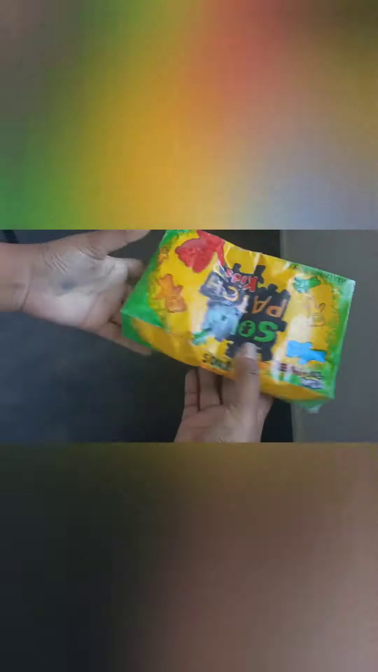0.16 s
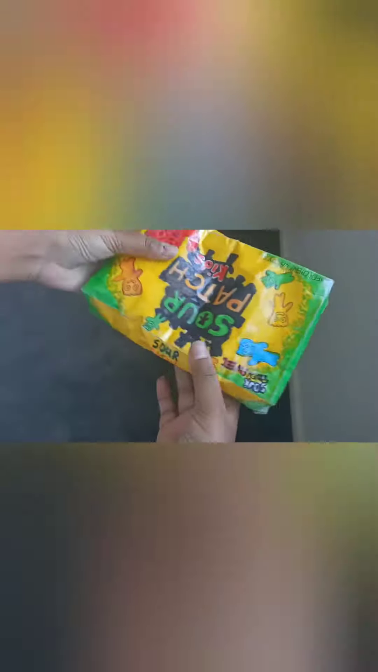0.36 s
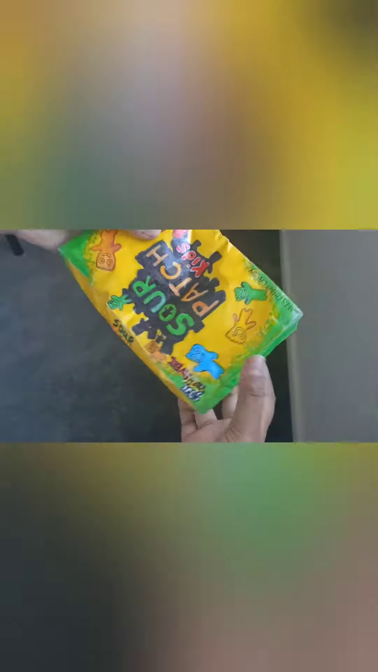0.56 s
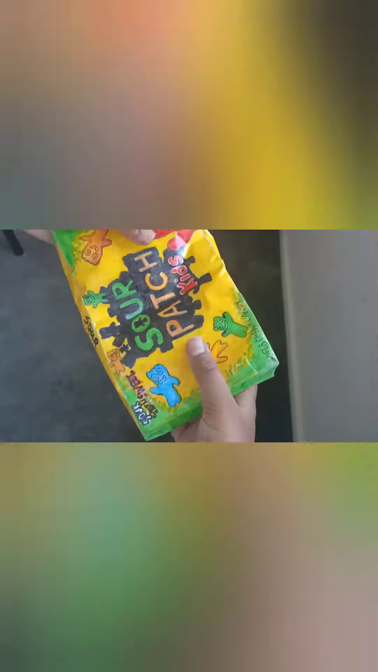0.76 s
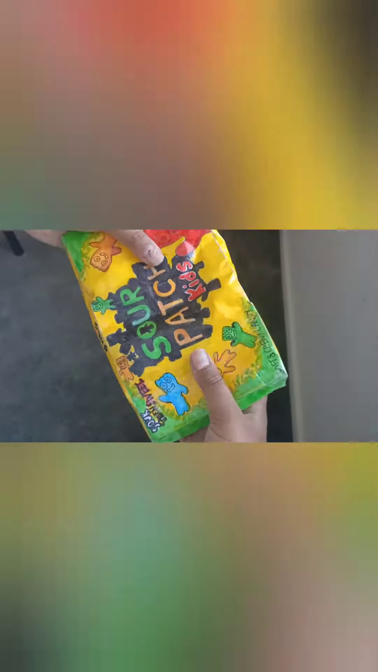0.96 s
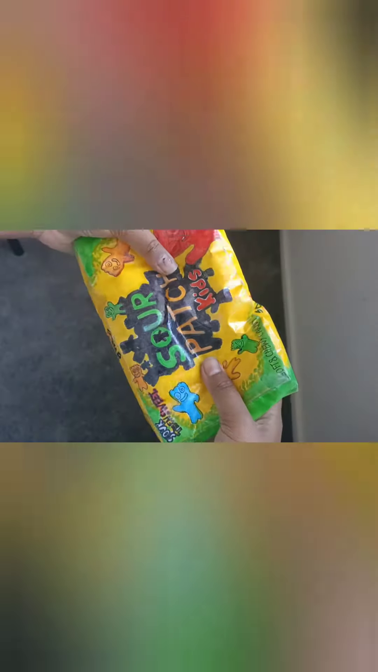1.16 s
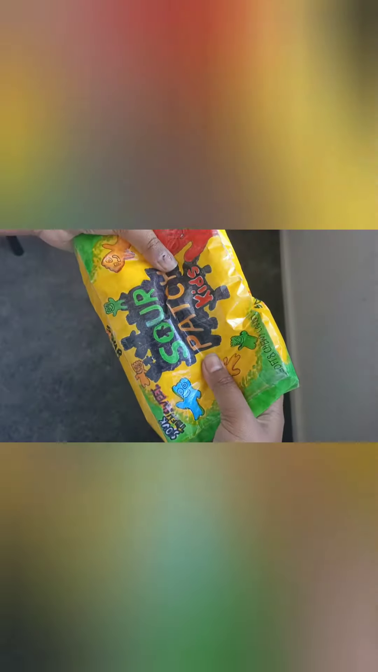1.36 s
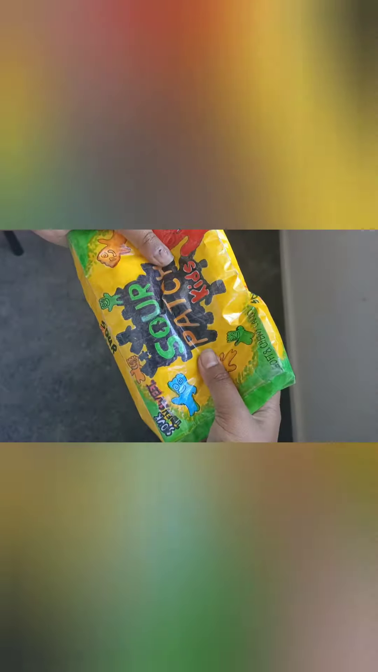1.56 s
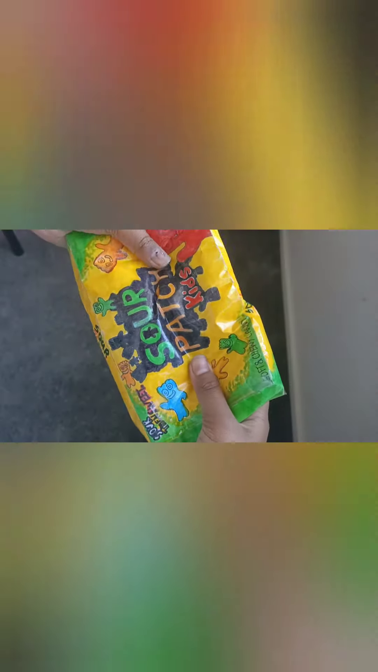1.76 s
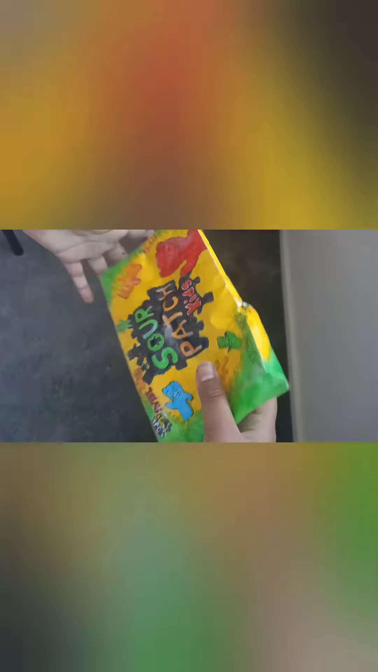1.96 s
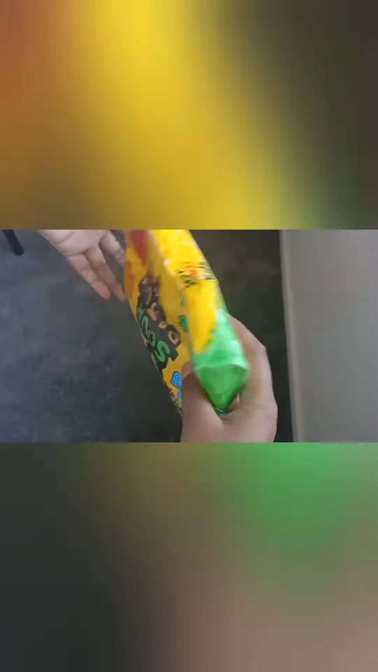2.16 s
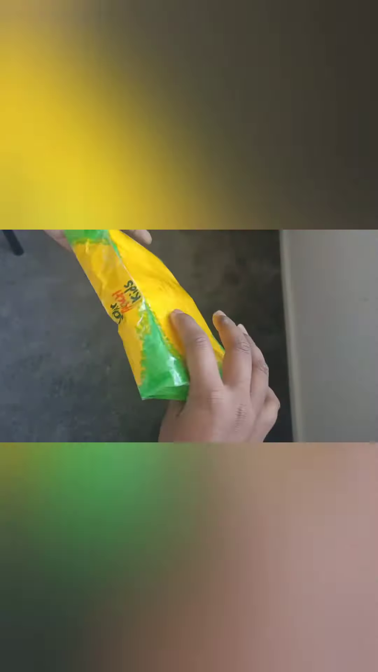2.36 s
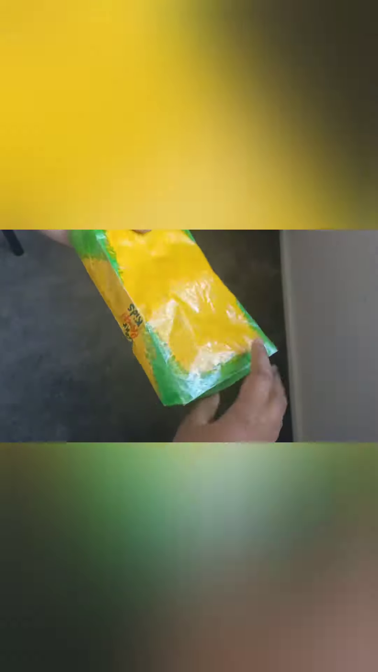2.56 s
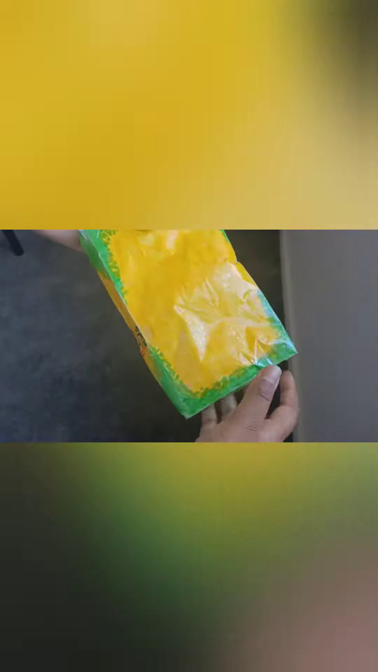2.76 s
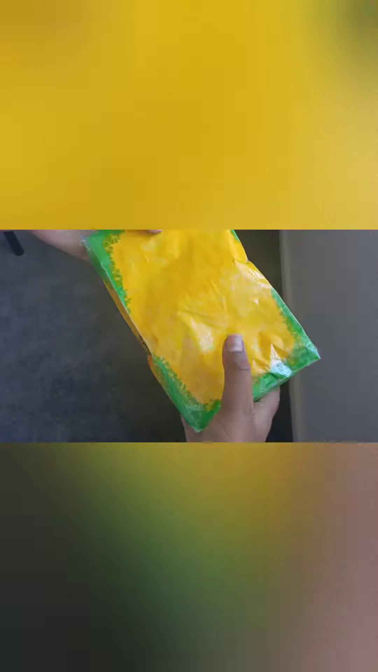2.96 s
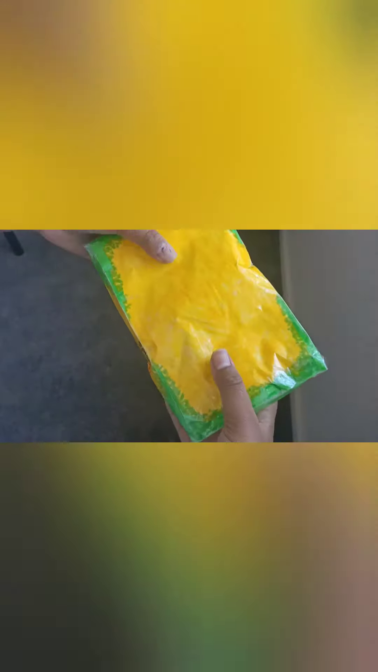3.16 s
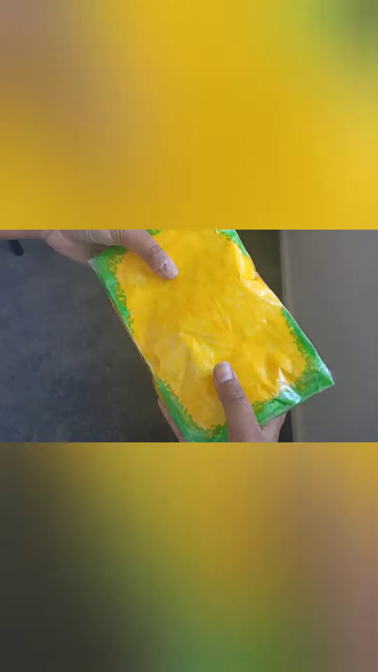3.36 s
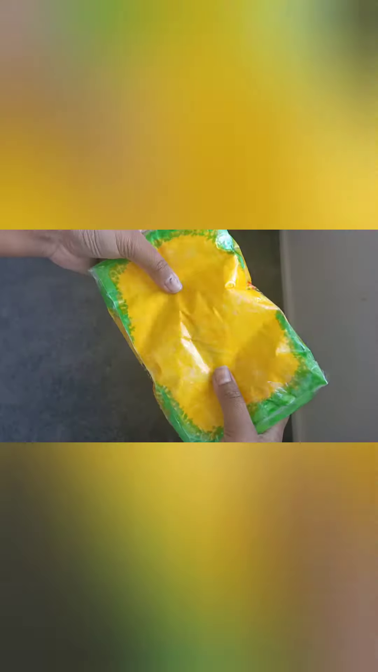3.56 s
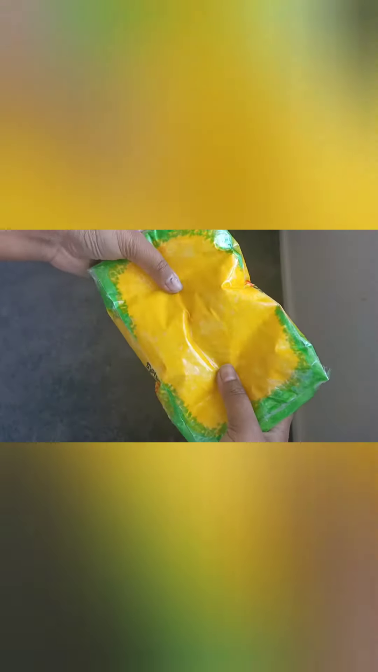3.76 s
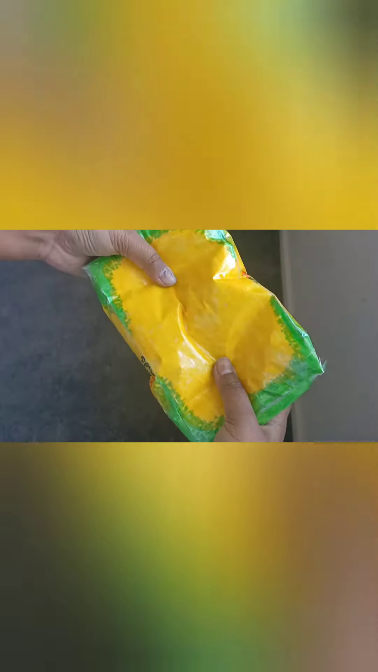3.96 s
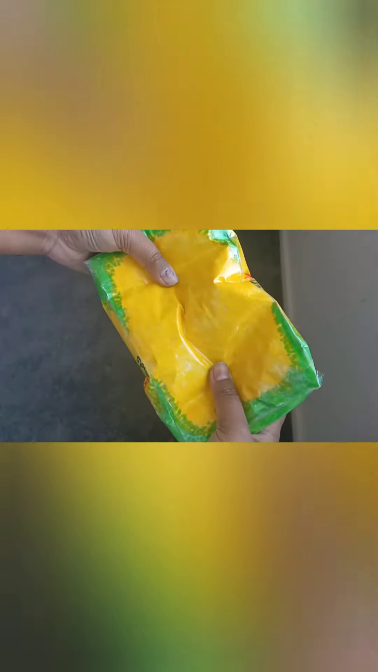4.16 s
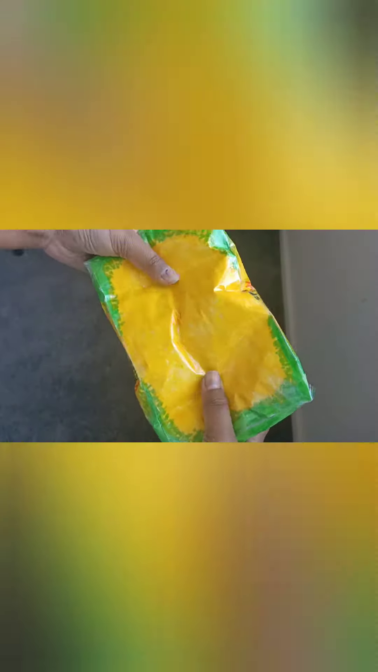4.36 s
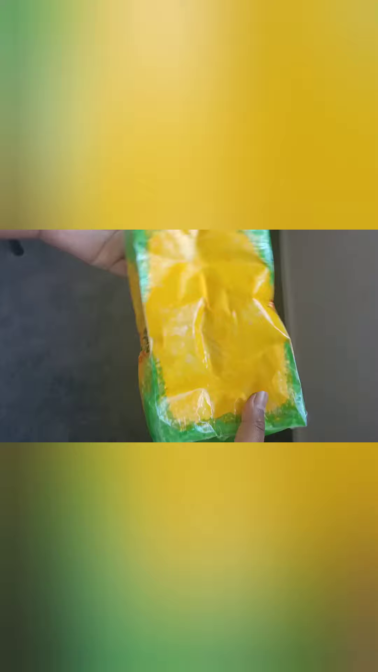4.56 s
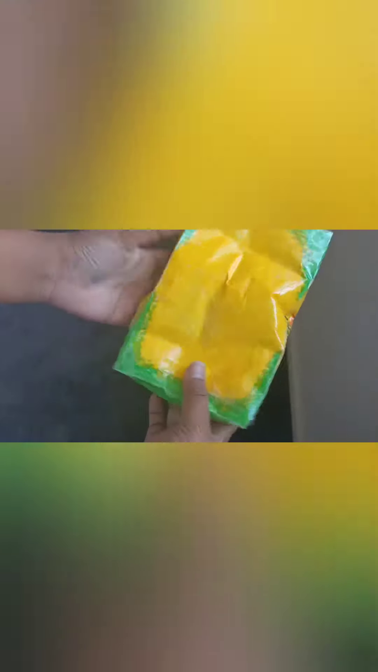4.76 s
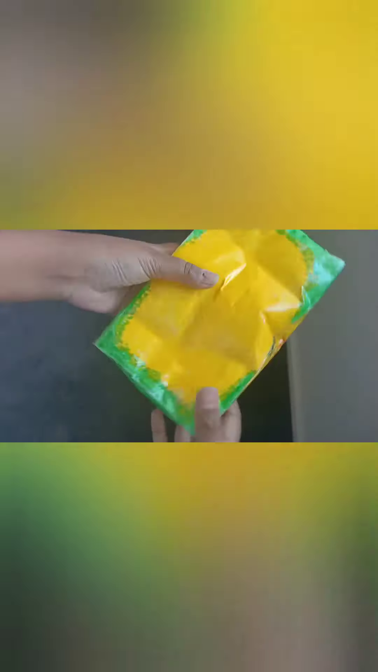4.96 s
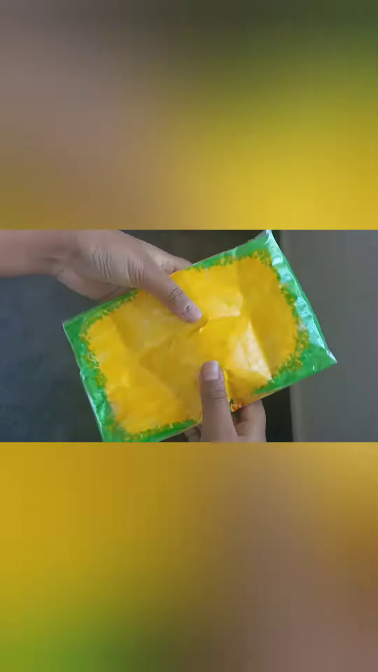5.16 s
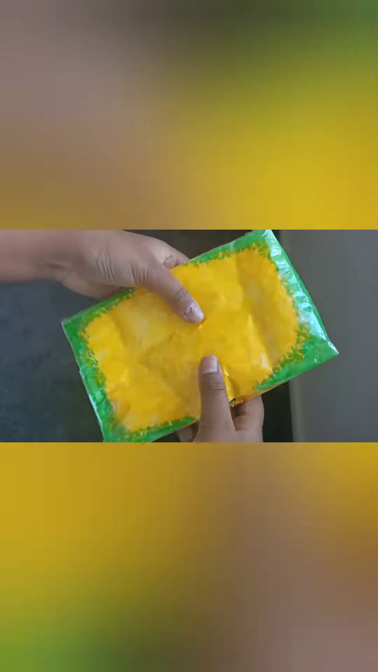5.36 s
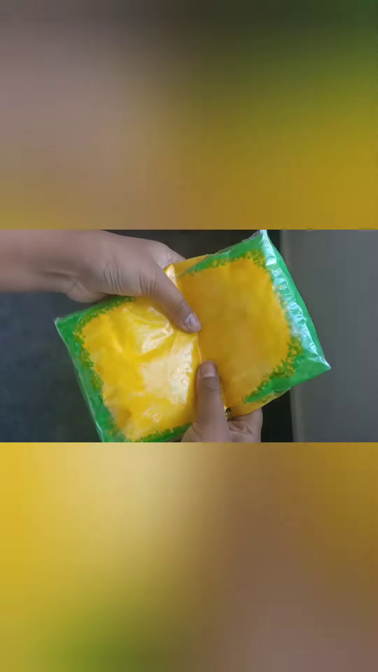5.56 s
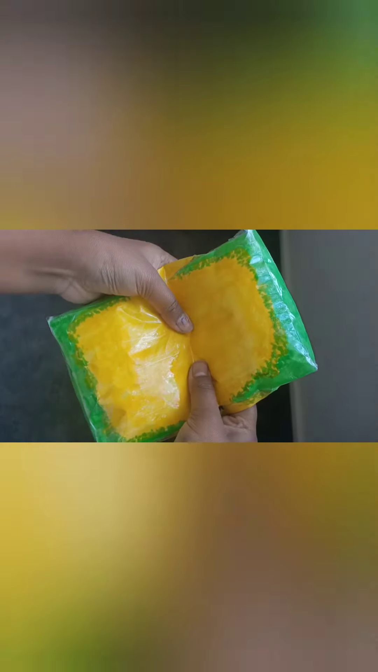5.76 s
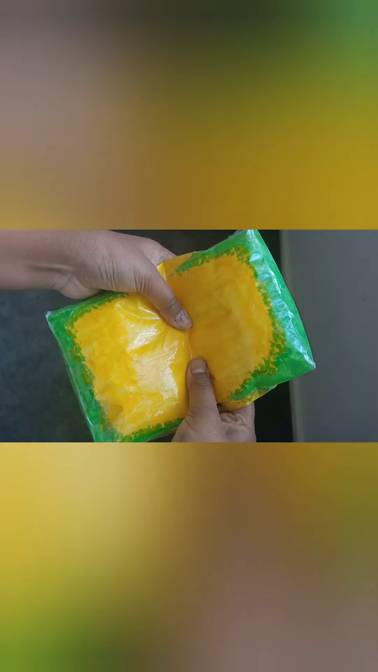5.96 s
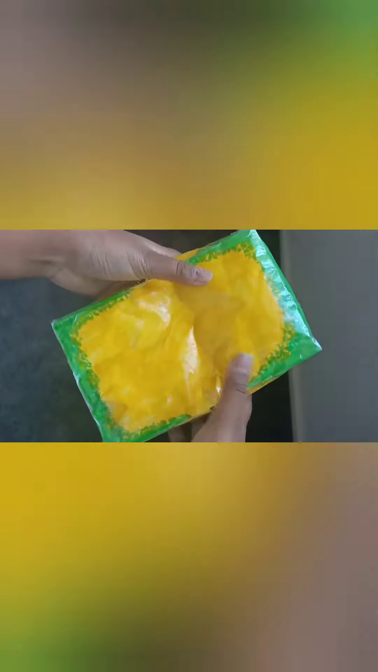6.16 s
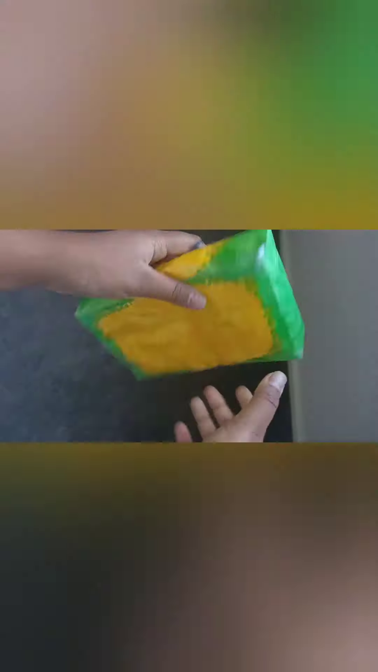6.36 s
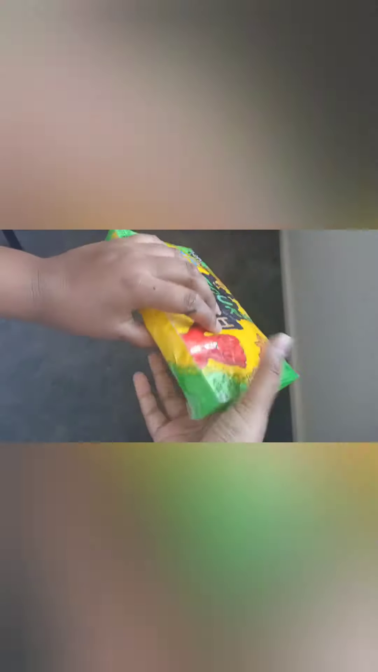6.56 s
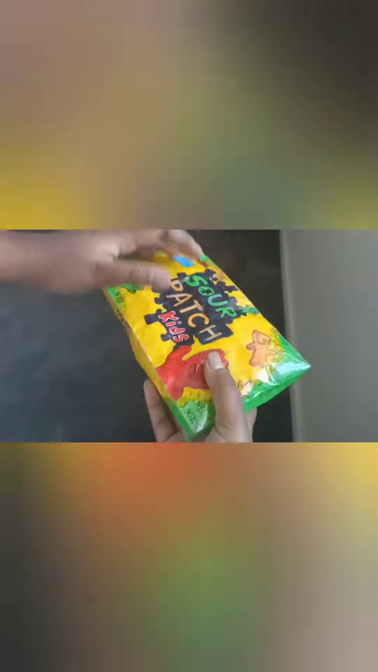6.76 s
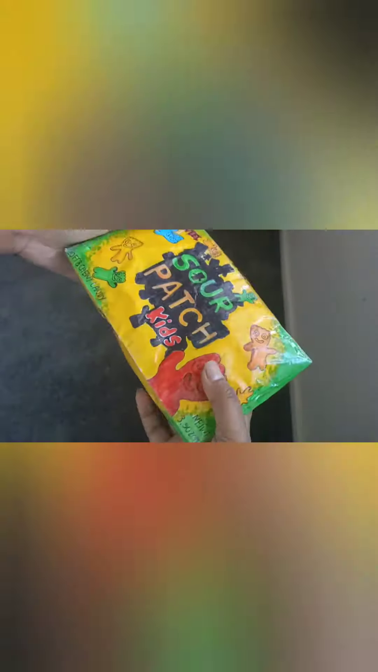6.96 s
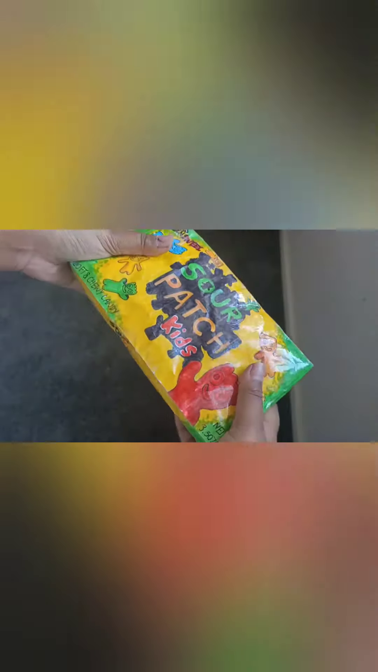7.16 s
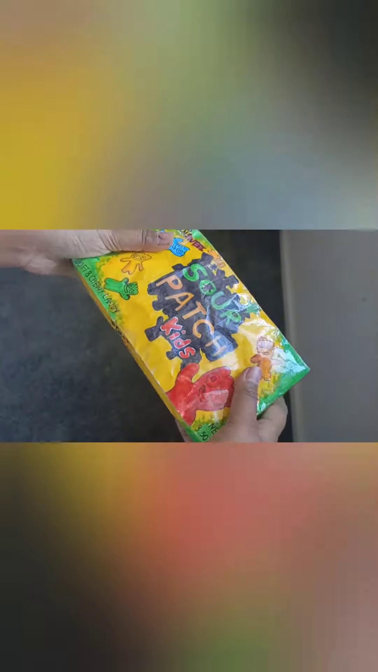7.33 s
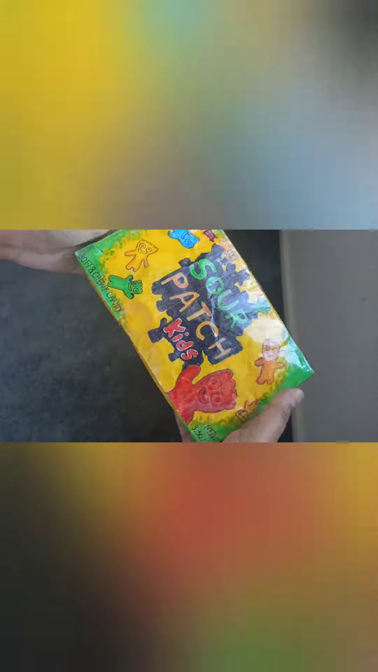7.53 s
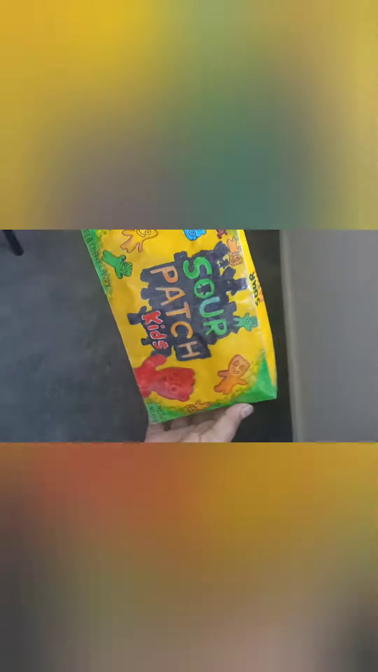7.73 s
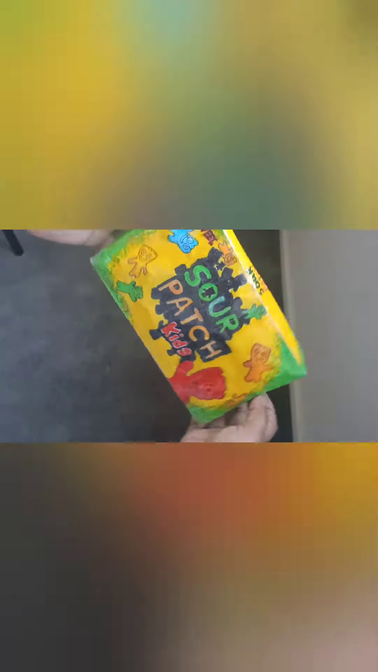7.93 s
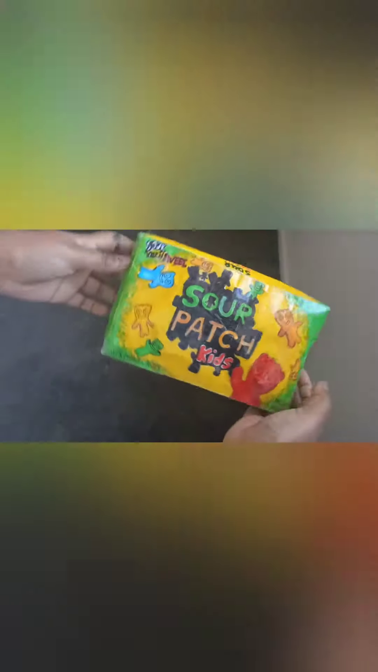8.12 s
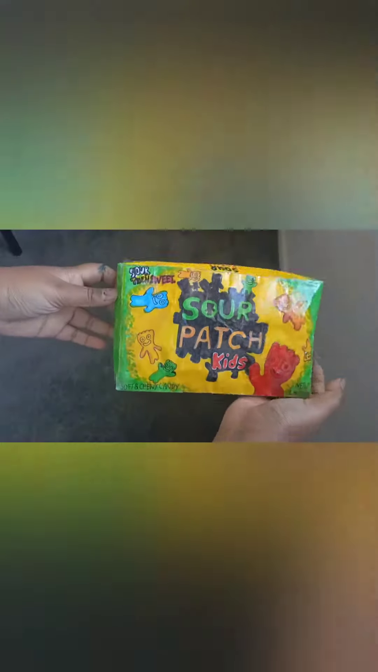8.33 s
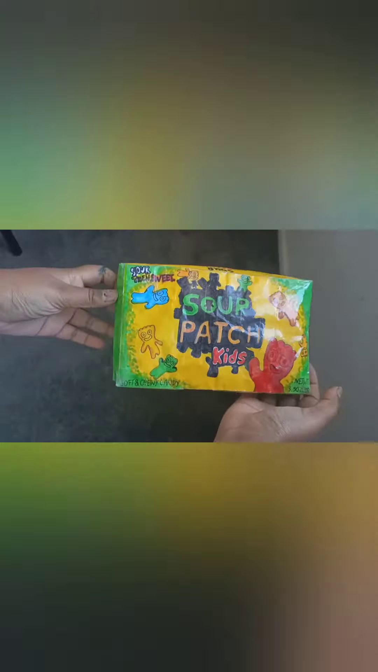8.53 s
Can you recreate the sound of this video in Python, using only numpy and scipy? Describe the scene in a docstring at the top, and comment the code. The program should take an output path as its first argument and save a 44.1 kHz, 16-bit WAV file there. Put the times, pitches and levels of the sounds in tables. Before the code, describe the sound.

A padded paper craft is turned and squeezed by hand. Stiff panels buckle with dry, sharp pops surrounded by fine crackle, dull low finger thumps and grainy rubbing on tape. Air hisses out through the seams during deep squeezes. Bursts are irregular, strongest early and past the middle, then fade to a few ticks. Close stereo pickup, short room tail, soft low room tone.

```python
"""Two hands turn and squeeze a stuffed pouch of taped paper close to a small stereo microphone.
At first fingers slide and bump softly and a faint tone wavers; near 1 s the panels buckle in loud snaps.
More bursts of snaps come near 3.5, 4.4, 5.5 and 6.1 s, then weaker ones near 7.2 s, and last a few faint ones.
Small creases crackle along with the bends, and air hisses through the seams near 1.2, 3.7 and 5.7 s.
A small, quiet room answers with a short tail, over a soft room tone."""
import sys
import numpy as np
from scipy import signal
from scipy.fft import rfft, irfft
from scipy.io import wavfile
from scipy.ndimage import uniform_filter1d

SR = 44100
rng = np.random.default_rng(int(sys.argv[2]) if len(sys.argv) > 2 else 0)


def bounce(signal):
    """Save signal as a 16-bit WAV file at the path given by the first command-line argument."""
    frames = np.transpose(np.atleast_2d(signal))
    limited = np.clip(frames, -1, 1)
    pcm = np.round(limited * 32767).astype(np.int16)
    wavfile.write(sys.argv[1], SR, pcm)


N = 378810
TIME = np.arange(N) / SR  # seconds
SIZE = 2048  # samples in a short pulse
BINS = np.fft.rfftfreq(SIZE, 1 / SR)  # Hz
EDGE_HZ = 15650  # upper limit of the sound

# Buckles of the paper. Each row: time in seconds, nominal level in dB, pitch of the panel in Hz,
# dullness in dB lost per octave above that pitch, left minus right in dB.
SNAPS = [(0.3586, -56, 720.0, 10, 1.0), (0.369, -51.5, 780.0, 7, 6), (0.375, -55, 1200.0, 17, 2),
         (0.757, -58, 530.0, 25, 7), (0.7736, -48.5, 970.0, 2, 1), (0.794, -57, 530.0, 6, -3),
         (0.8823, -56.5, 1200.0, 15.0, 0), (0.9366, -49, 490.0, 8.5, 1), (0.9751, -33, 1500.0, 13.5, -1),
         (0.9843, -33.0, 340.0, 11.5, 4), (1.0049, -20, 370.0, 5, 4.0), (1.0302, -19.5, 970.0, 9.5, 2),
         (1.0411, -35, 1300.0, 8.5, 1.0), (1.089, -37, 530.0, 9, 4.0), (1.1408, -29.5, 570.0, 9, 2),
         (1.2429, -43, 370.0, 7.5, 2.5), (1.6259, -59.5, 900.0, 11.5, 1.0), (1.798, -43.5, 1800.0, 14, -3),
         (1.834, -33.5, 460.0, 2, 2.0), (1.877, -38.5, 200.0, 3.5, 2.0), (1.9555, -31.5, 2930, 6.5, 4),
         (2.182, -48.5, 670.0, 4.0, -2.5), (2.4188, -53.5, 270.0, 5.0, 2), (2.4602, -49.5, 620.0, 6, -1.0),
         (2.6265, -48, 200.0, 4, -1.0), (2.6652, -50, 1200.0, 13, 0.0), (2.7458, -54, 290.0, 8.0, 1.0),
         (2.8868, -57, 343, 4, -1.0), (2.9324, -55, 390.0, 6.0, -1), (2.941, -53, 606, 12, 6.0),
         (2.9787, -53, 200.0, 3, 3), (3.0805, -57, 570.0, 7.5, 1.5), (3.1968, -59, 420.0, 19, 4.0),
         (3.22, -57, 420.0, 4.0, 0), (3.3099, -54.0, 530.0, 14.5, 3.0), (3.3616, -52, 670.0, 11.0, 3),
         (3.4155, -41, 1000.0, 14.5, 3.0), (3.4318, -36.0, 1600.0, 14.5, 3.5),
         (3.463, -35.0, 530.0, 6.5, 3), (3.477, -33.5, 8000.0, 26, -5), (3.4836, -38, 970.0, 10, -1.0),
         (3.4893, -36, 1100.0, 12.0, -2), (3.5384, -25.5, 670.0, 9, 0.5), (3.5674, -45.5, 1300.0, 15, 4),
         (3.6283, -29, 1100.0, 14, 0.5), (3.7117, -42.5, 670.0, 13, 3), (4.204, -51.5, 310.0, 7.0, 2.5),
         (4.309, -41.0, 200.0, 5, 1.5), (4.3946, -38, 570.0, 6.5, 1.0), (4.4262, -25.5, 970.0, 4, 1.5),
         (4.4318, -31.5, 420.0, 1.5, -1), (4.4492, -35, 1900.0, 12, 1.0), (4.4915, -38.5, 250.0, 3.5, 0.0),
         (4.6709, -39, 4400.0, 8, 3), (4.8026, -59, 1200.0, 0.5, 2.0), (4.9056, -51, 570.0, 6.5, 2),
         (5.0242, -44.5, 270.0, 0.5, 3.5), (5.2029, -47, 390.0, 7, 3), (5.2548, -34.5, 1000.0, 6.5, 2.5),
         (5.2864, -31.5, 780.0, 8.5, 2.0), (5.2976, -47.5, 530.0, 5, -3), (5.402, -35.0, 1100.0, 15.5, 1),
         (5.4289, -42.0, 460.0, 6, 2), (5.472, -44, 500.0, 12.0, 4), (5.4994, -35.5, 620.0, 9.5, 1.0),
         (5.517, -25.5, 840.0, 11.0, 4), (5.5352, -36.0, 720.0, 5.5, 1.0), (5.5655, -26, 570.0, 17.5, 3.5),
         (5.6034, -34, 570.0, 13, 5), (5.6276, -34.5, 1900.0, 13.5, 0.5), (5.678, -44.0, 840.0, 10.5, 2.5),
         (5.83, -44.5, 720.0, 6.5, 4), (6.0698, -48, 780.0, 10.5, 2.0), (6.096, -41.5, 220.0, 6.0, 2.5),
         (6.1225, -36.0, 420.0, 6, 1.0), (6.144, -38, 2400.0, 4.5, 1.0), (6.1508, -32, 720.0, 5.0, -1),
         (6.1548, -30.5, 670.0, 4.5, 1), (6.2497, -59, 780.0, 15, 3), (6.3134, -59.5, 530.0, 4, 1),
         (6.5009, -59, 310.0, 5.0, 2.0), (6.598, -56, 420.0, 5, 2), (6.651, -49, 570.0, 5.5, 0.5),
         (6.7102, -50, 200.0, 3.0, 2.0), (6.7268, -55, 1100.0, 5, -1.0), (6.8449, -54.5, 460.0, 3.5, 1),
         (7.0209, -48, 620.0, 7.5, -1), (7.1149, -50.5, 840.0, 9.0, 2), (7.1277, -53.5, 300.0, 4.0, 1.0),
         (7.1497, -46, 600.0, 8.0, 4.0), (7.1625, -38.5, 1000.0, 10.5, 1.5), (7.1762, -43.5, 221, 11, 1),
         (7.2211, -47, 570.0, 8, 0), (7.2823, -45, 840.0, 15, -1.0), (7.3009, -48, 620.0, 16, -4),
         (7.316, -42.5, 220.0, 9, 2), (7.4667, -54.0, 400.0, 7, 5), (7.4948, -37.0, 1107, 8.0, -1.0),
         (7.6622, -46, 2660, 16.5, 1), (7.9874, -62.5, 6970, 2.0, -1), (8.4073, -57, 530.0, 12, 0.0),
         (8.421, -52, 1400.0, 13.5, 3.0), (8.513, -64, 390.0, 10.5, 2)]


def amp(db):
    """Decibels to gain."""
    return 10 ** (np.asarray(db) / 20)


def evened(x):
    """Scales a sound to an rms of 1."""
    return x / np.sqrt(np.mean(x ** 2) + 1e-20)


def read(points, hz):
    """Reads a table between its points, along a logarithmic frequency axis."""
    point_hz, value = np.transpose(points)
    return np.interp(np.log(hz + 1), np.log(point_hz + 1), value)


def add(mix, s, sound):
    """Lays a stereo sound into the mix at time s."""
    part = mix[:, max(round(s * SR), 0):][:, :sound.shape[1]]
    part += sound[:, :part.shape[1]]


def causal(db):
    """The most compact spectrum with these levels on BINS whose sound does not start before its cause."""
    cepstrum = irfft(np.log(amp(np.maximum(db, -140))))
    # fold the backward half of time onto the forward half
    cepstrum[..., 1:SIZE // 2] *= 2
    cepstrum[..., SIZE // 2 + 1:] = 0
    return np.exp(rfft(cepstrum))


def diffuse(spectrum, count):
    """Stereo noise of a given spectrum, which reaches both ports most alike in the bass."""
    # Likeness of the two ports. Each row: frequency in Hz, likeness from 0 to 1.
    likeness = [(100, .88), (400, 0.3), (900, 0.69), (1600, 0.1), (8000, 0.1)]
    hz = np.fft.rfftfreq(count, 1 / SR)
    left, other = rfft(rng.standard_normal((2, count)))
    same = np.clip(read(likeness, hz), 0, 1)
    right = same * left + np.sqrt(1 - same ** 2) * other
    return irfft(np.array([left, right]) * amp(read(spectrum, hz)), count)


def wander(count):
    """Slow chance over the whole scene: straight lines between count random points."""
    return np.interp(TIME, np.linspace(0, TIME[-1], count), rng.standard_normal(count))


def swells(rows, build, curve):
    """Power over time of pressing gestures: each builds for a share of its dying time, peaks and lets go."""
    power = np.zeros(N)
    for s, db, length in rows:
        # a negative length lets go faster than it builds; a length of zero adds nothing
        away = np.maximum((s - TIME) / (build * length), (TIME - s) / length)
        near = away < 4
        power[near] += amp(db - 20 * away[near] ** curve) ** 2
    return power


def snaps(level_db=-0.36):
    """The buckles: as aimed at the microphone, and as the smoother sum of all directions that fills the room."""
    aimed, all_round = np.zeros((2, 2, N))
    for s, snap_db, hz, dullness, pan_db in list(SNAPS) + ticks():
        db = snap_spectrum(snap_db, hz, dullness)
        pan = amp([[pan_db / 2], [-pan_db / 2]])
        # the tearing begins before the flip, so its pulse is laid in early
        add(aimed, s - SIZE // 8 / SR, tearing(rebound(buckle(db))) * pan)
        add(aimed, s, ringing(snap_db, hz) * pan)
        add(all_round, s, np.tile(irfft(causal(db + pouch_colour())), (2, 1)))
    return amp(level_db) * aimed, amp(level_db) * all_round


def snap_spectrum(level_db, hz, dullness, thin_db_per_octave=4.5):
    """A panel radiates less and less below its pitch, and also falls away above it."""
    # Colour that all snaps share. Each row: frequency in Hz, gain in dB.
    paper = [(25, -24), (70, -5), (134, 0.5), (265, 0), (443, -2.5), (1000, 0), (2160, -0.5), (3100, 2),
             (4500, 0.5), (9400, 0.5), (12850, -4), (15650, -6.5)]
    octaves = np.log2((BINS + 1) / hz)
    below = thin_db_per_octave * np.minimum(octaves, 0)
    above = -dullness * np.maximum(octaves, 0)
    db = below + above + read(paper, BINS)
    # the level counts as the rms over 5 ms, before the pouch adds its colour
    return level_db + db - 10 * np.log10(np.mean(amp(db) ** 2) / (.005 * SR))


def pouch_colour():
    """The broad resonances of the pouch over BINS, in dB."""
    # Each row: frequency in Hz, width in Hz, gain in dB.
    resonances = [(256, 27, 2), (428, 110, 6.5), (720, 450, -1.5), (1300, 900, 0.5)]
    return sum(gain / (1 + (2 * (BINS - hz) / width) ** 2) for hz, width, gain in resonances)


def ripple(count):
    """A random wavy curve over BINS, with wider waves in the treble and no overall slope."""
    place = np.log1p(BINS / 1500)
    knots = rng.standard_normal(count + 1)
    level = knots - uniform_filter1d(knots, size=5)
    return np.interp(place / place[-1] * count, np.arange(count + 1), level)


def buckle(db, panel_db=2.5, aim_db=3, lead_s=.00009, scatter_s=.00012):
    """One panel flips: a single pressure pulse, coloured by the pouch, by its own shape and by its aim at each port."""
    smooth = db + pouch_colour()
    beaming = BINS / (BINS + 1200)  # aim matters more in the treble
    aim = aim_db * beaming * np.array([ripple(count=22), ripple(count=22)])
    uneven = smooth + panel_db * ripple(count=30) + aim
    keep_energy = np.sqrt(np.mean(amp(smooth) ** 2) / np.mean(amp(uneven) ** 2))
    # the left port hears it first when lead is positive
    lead = lead_s + scatter_s * rng.standard_normal()
    delay = 16 / SR + np.array([[-lead], [lead]]) / 2
    pulse = irfft(causal(uneven) * np.exp(-2j * np.pi * BINS * delay))
    return keep_energy * pulse * rng.choice([-1, 1])


def rebound(pulse, rebound_db=-9.5, soonest_s=.001, latest_s=.005, corner_hz=3000):
    """The panel overshoots and knocks again a moment later, weaker and duller."""
    delay = np.exp(-2j * np.pi * BINS * rng.uniform(soonest_s, latest_s))
    knock = amp(rebound_db) * delay / (1 + 1j * BINS / corner_hz)
    return irfft(rfft(pulse) * (1 - knock))


def tearing(pulse, split_hz=2400, share=.42, build_s=.0014, fade_s=0.0013):
    """Part of a snap's treble spreads over a tiny crackle as the crease runs, swelling into the flip and dying after it."""
    t = (np.arange(SIZE) - SIZE // 8) / SR
    run = rng.standard_normal((2, SIZE)) * np.exp(np.minimum(t / build_s, -t / fade_s))
    run /= np.linalg.norm(run, axis=1, keepdims=True)
    spread = np.clip(share, 0, 1) * BINS ** 2 / (BINS ** 2 + split_hz ** 2)
    flip = rfft(1. * (t == 0))
    return irfft(rfft(pulse) * (np.sqrt(1 - spread) * flip + np.sqrt(spread) * rfft(run)))


def ringing(level_db, hz, ring_db=-17, t60_s=.09, scatter_octaves=.45, count=3):
    """After its flip the taut panel rings on faintly, in a few modes around its pitch."""
    t = np.arange(SR // 6) / SR
    scatter = scatter_octaves * rng.uniform(-1, 1, (count, 1))
    modes = np.minimum(hz * 2 ** scatter, EDGE_HZ)
    ring = np.sin(2 * np.pi * modes * t).sum(0) / np.sqrt(count)
    return amp(level_db + ring_db) * ring * np.exp(-np.log(1000) * t / t60_s)


def ticks(count=5, spread_db=1.5, pitch_hz=700, spread_octaves=.9, dullness=6.0, dullness_spread=1.8,
          pan_db=2.0, pan_spread_db=5.5):
    """Faint buckles of chance size and place while the fingers turn the pouch and regrip; rows like those of SNAPS."""
    # Each row: start in seconds, end in seconds, middle level of the ticks in dB.
    regrips = [(.2, 0.749, -66.5), (2.78, 3.399, -65.5), (4.819, 5.001, -62.5), (6.403, 7.0, -58.5),
               (6.979, 7.471, -54), (7.701, 8.347, -66)]
    rows = []
    for start, end, db in regrips:
        times = start + (end - start) * (np.arange(count) + rng.random(count)) / count
        for s, (force, size, dull, side) in zip(times, rng.standard_normal((count, 4))):
            rows.append((s, db + spread_db * force, pitch_hz * 2 ** (spread_octaves * size),
                         dullness + dullness_spread * dull, pan_db + pan_spread_db * side))
    return rows


def crackle(level_db=-2, per_s=350, spread_db=4.5, count=24, held_db=-86):
    """Many small creases give way at random, louder as the paper bends harder."""
    # Sound of a crease. Each row: frequency in Hz, relative level in dB.
    crease_spectrum = [(50, -20), (150, -9.5), (400, -3), (1100, -3.5), (2200, -8), (4000, -10.5),
                       (8000, -26.5), (15000, -39.5)]
    # Each row: time of greatest strain in seconds, nominal crackle level in dB,
    # seconds in which it dies by 20 dB (if negative, the seconds are scaled and let go faster than they build).
    bends = [(.33, -71, 0.54), (.75, -64.5, -0.36), (1.05, -54, 0.3), (1.44, -66, .13), (1.87, -47.5, 0.13),
             (2.64, -67, 0.23), (3.1, -63.5, 0), (3.58, -50.5, 0.31), (4.45, -45.5, 0.17), (4.87, -74.5, 1),
             (5.29, -51, 0.12), (5.53, -39, 0.1181), (6.125, -45.5, 0.0454), (6.67, -57.5, 0.1),
             (6.83, -61.5, 0), (7.18, -56.5, 0.14), (7.42, -61.5, -0.04), (7.8, -71.5, 0.7)]
    happens = rng.random(N) < per_s / SR
    size = amp(spread_db * np.minimum(rng.exponential(1, N), 3)) * happens
    crease = rng.integers(0, count, N)  # which of the creases gives way
    out = np.zeros((2, N))
    for k in range(count):
        pulse = buckle(read(crease_spectrum, BINS))
        out += signal.oaconvolve((size * (crease == k))[None], pulse, axes=1)[:, :N]
    bending = amp(level_db) ** 2 * swells(bends, build=0.71, curve=0.96) + amp(held_db) ** 2
    return np.sqrt(bending + avalanches()) * evened(out)


def avalanches(level_db=-39, follow=0.57, before_s=0.0032, after_s=0.011):
    """Power of the crackle that leads up to each buckle and trickles on after it."""
    s, db = np.transpose(SNAPS)[:2]
    load = np.zeros(N)
    load[(s * SR).astype(int)] = amp(level_db + follow * db) ** 2
    t = np.arange(-SR // 10, SR // 10 + 1) / SR
    shape = np.exp(np.minimum(t / before_s, -t / after_s))
    return abs(signal.oaconvolve(load, shape, "same"))


def slides(level_db=-1, grain_db=2.5):
    """Skin catches and slips on the tape: a short, grainy scrape."""
    # Each row: middle in seconds, length in seconds, nominal level in dB, tilt in dB per octave.
    slide_rows = [(0.291, 0.22, -68, 1), (0.472, 0.066, -47.5, 1), (1.859, 0.19, -53.5, 0.5),
                  (2.63, 0.049, -51.5, -2.5), (3.105, 0.065, -66.5, -2.5), (4.397, 0.079, -50.5, -3),
                  (4.441, 0.1, -43, -1.5), (4.491, 0.047, -41, -2), (4.907, 0.071, -60, -2),
                  (5.425, 0.059, -59, 1), (6.099, 0.092, -47, -5), (6.15, 0.068, -44, 1),
                  (6.72, 0.21, -63, -1.5), (6.83, 0.083, -57.5, -3), (6.928, 0.028, -62, 2.5),
                  (7.008, 0.1, -59, -3.5), (7.322, 0.69, -64, -1), (8.137, 0.23, -65, -1)]
    # Sound of rubbing before the tilt. Each row: frequency in Hz, relative level in dB.
    rub = [(100, -15), (700, 1.5), (1500, 2.5), (3000, 0.5), (6000, 0.5), (9000, -2), (15000, -4.5)]
    out = np.zeros((2, N))
    for s, length, db, tilt in slide_rows:
        count = int(length * SR)
        catching = evened(uniform_filter1d(rng.standard_normal(count), size=70))
        grip = amp(grain_db * np.tanh(catching / 2) * 2)
        spectrum = [(hz, level + tilt * np.log2(hz / 8000)) for hz, level in rub]
        scrape = evened(diffuse(spectrum, count) * grip)
        add(out, s - length / 2, amp(db + level_db) * scrape * np.hanning(count))
    return out


def bumps(level_db=0.0, rise_s=0.0042, upper=1.71, upper_db=-12):
    """The stuffing damps a finger's knock within a few cycles."""
    # Each row: start in seconds, nominal peak in dB, pitch in Hz.
    knocks = [(.209, -50.5, 100), (1.873, -45.5, 113), (2.03, -48, 99.6), (2.621, -45.5, 102.5),
              (2.814, -55, 99.3), (2.978, -48.5, 75), (4.431, -48, 90), (4.908, -48, 105),
              (5.202, -48.5, 103), (5.519, -36.5, 101), (6.15, -42, 110), (6.668, -54, 113),
              (6.835, -55, 89.5), (7.101, -51, 107), (7.315, -44, 125), (8.084, -51.5, 177),
              (8.108, -52.5, 168), (8.14, -59.5, 160.3)]
    out = np.zeros((2, N))
    t = np.arange(SR // 8) / SR
    thump = t / rise_s * np.exp(1 - t / rise_s)  # swells to 1 and dies away
    for s, db, hz in knocks:
        swing = np.sin(2 * np.pi * hz * t) + amp(upper_db) * np.sin(2 * np.pi * hz * upper * t)
        add(out, s, np.tile(amp(db + level_db) * swing * thump, (2, 1)))
    return out


def air(level_db=3, flutter_db=1.0):
    """Deep squeezes drive bright turbulence through the seams, which flutter slightly in the stream."""
    # Each row: time of strongest flow in seconds, nominal hiss level in dB, seconds in which it dies by 20 dB.
    squeezes = [(1.2, -52, 0.3247), (3.73, -53, 0.3955), (5.66, -61.5, 0.21)]
    # Sound of the hiss. Each row: frequency in Hz, relative level in dB.
    jet = [(200, -16.5), (1500, -9.5), (3000, -0.5), (5000, -0.5), (8000, 0), (11000, -1.5), (15000, 1)]
    flow = np.sqrt(swells(squeezes, build=.72, curve=2.8))
    return amp(level_db + flutter_db * wander(count=900)) * flow * evened(diffuse(jet, N))


def room(x, build_s=0.00096):
    """Hands, table and walls scatter each sound into a short tail."""
    # Dying time. Each row: frequency in Hz, seconds to die by 60 dB.
    dying_time = [(100, 0.48), (400, 0.2053), (1200, 0.27), (4000, 0.29), (14000, 0.4)]
    # Strength of the tail. Each row: frequency in Hz, level in dB against the sound sent in.
    send = [(100, -9.5), (300, -9), (500, -6.5), (1200, -9.5), (4000, -9.5), (14000, -15.5)]
    hz, t, z = signal.stft(diffuse(send, SR), SR, nperseg=256)
    t60 = read(dying_time, hz)[:, None]
    unit_energy = np.sqrt(2 * np.log(1000) / (t60 * SR))
    tail = signal.istft(z * unit_energy * amp(-60 * t / t60), SR, nperseg=256)[1]
    tail *= 1 - np.exp(-np.arange(tail.shape[1]) / SR / build_s)
    return signal.fftconvolve(x, tail, axes=1)[:, :N]


def tones(level_db=-1, waver=0.014, fading_db=4):
    """Thin, faint background tones that waver and fade in and out."""
    # Each row: start in seconds, length in seconds, middle pitch in Hz, nominal level in dB.
    tone_rows = [(0, 1.1, 194.6, -80), (4.147, 0.58, 698, -75.5), (6.55, 0.4, 688, -75),
                 (6.998, 0.93, 711, -81)]
    out = np.zeros(N)
    for start, length, hz, db in tone_rows:
        turns = np.cumsum(hz * (1 + waver * wander(count=160))) / SR
        arch = np.sin(np.pi * np.clip((TIME - start) / length, 0, 1))
        out += amp(db) * np.sqrt(2 * abs(arch)) * np.sin(2 * np.pi * turns)
    return amp(level_db + fading_db * wander(count=110)) * out


def room_tone(floor_db=-71.5):
    """The quiet, steady noise of the room, strongest in the bass."""
    # Each row: frequency in Hz, relative level in dB.
    tone_spectrum = [(20, -10), (50, -2), (100, 3), (200, -3.5), (320, -9.5), (1200, -14), (4000, -13),
                     (8000, -20.5), (15000, -19)]
    return amp(floor_db) * evened(diffuse(tone_spectrum, N))


def scene():
    """The handled pouch in its room."""
    rustle = crackle() + slides() + air() + bumps()
    aimed, all_round = snaps()
    return aimed + rustle + room(all_round + rustle) + tones() + room_tone()


def record(dry):
    """Each of the two microphone ports adds its own colour; then the treble is cut off at EDGE_HZ."""
    # Each row of the two tables: frequency in Hz, gain in dB.
    left_port = [(2500, 2), (3900, 0), (4900, -5), (6000, -3), (7100, 0.5), (8400, 9), (10000, 1),
                 (12000, -2.5), (14000, 0.5), (15500, -3.5)]
    right_port = [(2500, 2), (3900, 1), (4900, -5), (6000, 0.5), (7100, 7), (8400, 2.5), (10000, -0.5),
                  (12000, -2), (14000, 7), (15500, 0)]
    ports = irfft(causal(np.array([read(left_port, BINS), read(right_port, BINS)])))
    heard = signal.oaconvolve(dry, ports, axes=1)[:, :N]
    low_pass = signal.firwin(511, EDGE_HZ, window=("kaiser", 9), fs=SR)
    return signal.oaconvolve(heard, low_pass[None], "same")


dry = scene()
out = record(dry)
bounce(out)
```